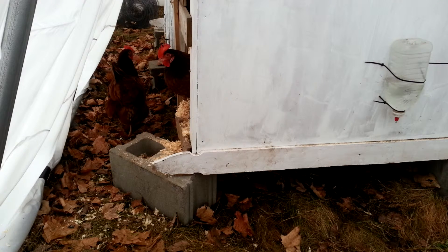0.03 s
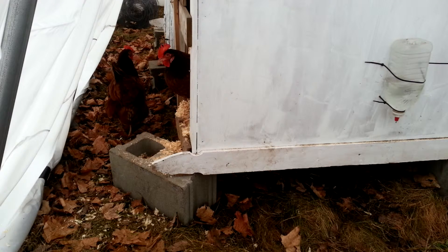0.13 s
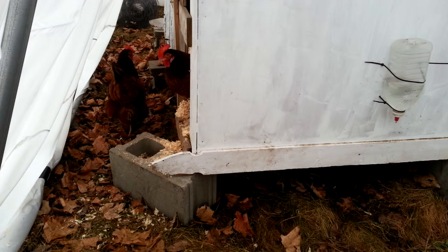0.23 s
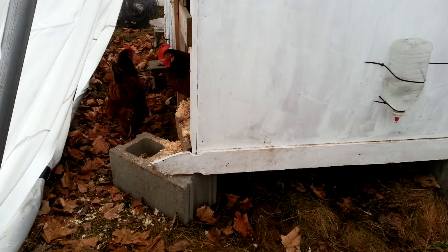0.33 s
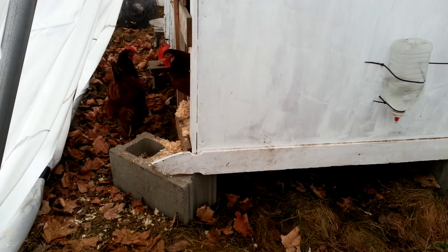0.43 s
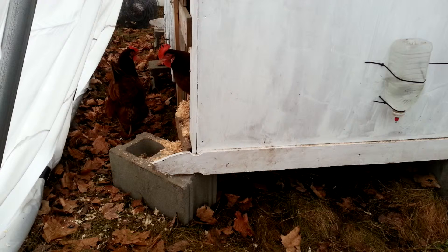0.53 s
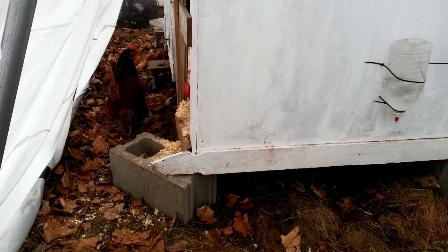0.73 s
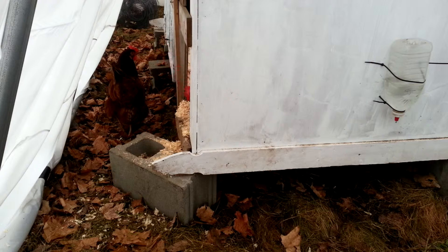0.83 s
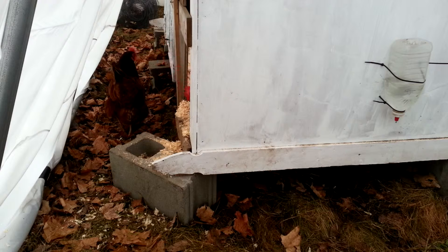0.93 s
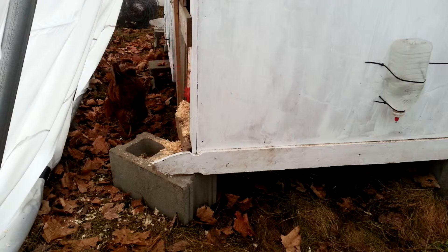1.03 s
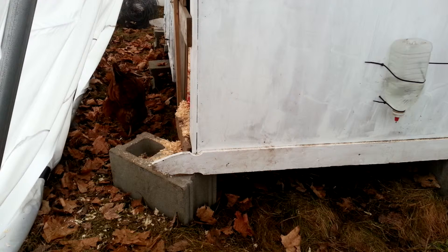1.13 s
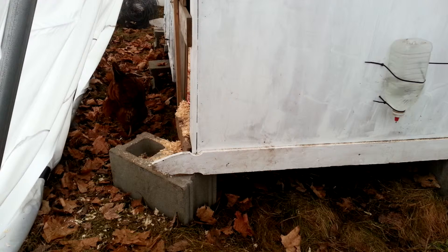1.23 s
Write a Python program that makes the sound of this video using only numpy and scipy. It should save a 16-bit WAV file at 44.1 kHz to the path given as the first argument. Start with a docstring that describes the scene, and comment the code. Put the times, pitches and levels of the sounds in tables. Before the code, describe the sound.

A chicken scratches in dry leaves with quick, crackling strokes in a quiet yard.

```python
"""A quiet yard, one microphone a few metres from a hen raking dry leaves behind a wooden coop.
Distant rumble, a faint hum and a far insect are there throughout. Her first strokes crush leaves into
crackle, scrape the litter and thud on the soil; the gap beside the coop adds a short ring. Midway
through the raking, twigs and a stalk snap and the claws strike. The leaves settle, two last strokes
follow, and a low drone swells briefly in the background."""
import sys
import numpy as np
from scipy import signal
from scipy.fft import rfft, irfft
from scipy.io import wavfile
from scipy.ndimage import uniform_filter1d

SR = 44100
rng = np.random.default_rng(int(sys.argv[2]) if len(sys.argv) > 2 else 0)


def int16_out(signal):
    """Quantize to a 16-bit WAV file."""
    q = np.round(np.clip(np.atleast_2d(signal).T, -1, 1) * 32767)
    wavfile.write(sys.argv[1], SR, q.astype(np.int16))


N = 57330


def amp(db):
    return 10 ** (np.asarray(db) / 20)


def unit_rms(x):
    return x / np.sqrt(np.mean(x ** 2))


def colour(x, spectrum, shift=1):
    """Filter a sound by a spectrum moved in pitch by a ratio; the filter is causal, with unit energy."""
    hz, db = np.array(spectrum, float).T
    bins_hz = np.maximum(np.fft.rfftfreq(8192, 1 / SR), 1)
    gain = amp(np.interp(np.log(bins_hz), np.log(hz * shift), db))
    cepstrum = irfft(np.log(gain))
    half = len(cepstrum) // 2
    cepstrum[1:half] *= 2  # fold to minimum phase
    cepstrum[half + 1:] = 0
    impulse = irfft(np.exp(rfft(cepstrum)))[:half]
    return signal.fftconvolve(x, impulse / np.sqrt(np.sum(impulse ** 2)))[:N]


def fall(age, t60):
    """Exponential decay that starts at age zero."""
    return np.exp(-np.log(1000) * np.maximum(age, 0) / t60)


# Spectrum of the open air in the yard: frequency_hz, level_db
YARD_SPECTRUM = [(20, -16), (50, 1), (90, -1.5), (160, -6), (225, -1), (290, -10.5), (400, -12),
                 (540, -14.5), (700, -11), (930, -15), (1250, -21.5), (1650, -22.5), (2500, -29),
                 (3300, -33), (4700, -32.5), (6300, -28), (7800, -33.5), (11000, -33), (15500, -38)]
# Steady hum in the background: pitch_hz, level_db
HUM_TONES = [(97, -87.5), (237, -81.5)]


def yard(t, level_db=-69.5, wander_db=1.5):
    """Distant rumble that wanders a little, with a faint hum."""
    wander = unit_rms(uniform_filter1d(uniform_filter1d(rng.standard_normal(N), 4000), 4000))
    air = amp(level_db + wander_db * wander) * colour(rng.standard_normal(N), YARD_SPECTRUM)
    hum = sum(amp(db) * np.sqrt(2) * np.sin(2 * np.pi * (hz * t + rng.random())) for hz, db in HUM_TONES)
    return air + hum


def insect(t, pitch_hz=8660, jitter_hz=8.7, level_db=-89, mean_period_s=.072, pause_s=.014):
    """Far from the microphone, an insect gives thin trills of uneven length with short pauses."""
    ends = np.cumsum(mean_period_s * (.5 + rng.random(32)))
    pauses = np.exp(-(2 * (t[:, None] - ends) / pause_s) ** 4).max(axis=1)
    hz = pitch_hz + jitter_hz * unit_rms(uniform_filter1d(rng.standard_normal(N), size=300))
    return amp(level_db) * np.sqrt(2) * (1 - pauses) * np.sin(2 * np.pi * np.cumsum(hz) / SR)


def foot_pressure(age, rise, hold, t60, curve=1.234):
    """A push rises and holds; with a curve above 1 it dies ever faster as the foot lifts."""
    late = np.maximum(age - rise - hold, 0) / t60
    return np.clip(age / rise, 0, 1) * np.exp(-np.log(1000) * late ** curve)


def fractures(rate_per_s=6000, spread_db=3.0):
    """Tiny random breaks in dry leaves, many weak and a few strong; rms 1."""
    size = amp(spread_db * np.minimum(rng.exponential(size=N), 5))
    breaks = rng.random(N) < rate_per_s / SR
    return unit_rms(breaks * size * rng.choice([-1, 1], N))


REFERENCE_HZ = 6200  # the pitch at which the leaf and crack spectra are unshifted
# Spectra of crushed leaves, scraped litter and struck soil: frequency_hz, level_db
LEAF_SPECTRUM = [(1000, -31), (2500, -15.5), (4000, -7), (5300, -2.5), (6500, 0), (7500, -5.5),
                 (9300, -14.5), (12000, -22), (16000, -26.5)]
SCRAPE_SPECTRUM = [(80, -20), (250, 1.5), (450, -1.5), (950, -1.5), (1150, -3), (1600, -3), (2200, -4),
                   (2600, -0.5), (4000, -5), (7000, -3), (14000, -31)]
THUD_SPECTRUM = [(25, -23), (48, -5), (90, 1), (125, 0), (180, -13.5), (400, -9), (1500, -60)]
# Strokes of a foot behind the coop:
# start_s, rise_s, hold_s, t60_s, crackle_db, scrape_db, thud_db, leaf_pitch_hz, hollow_pitch_hz
FOOT_STROKES = [(0.141, 0.0095, 0.0031, .11, -51.5, -67.5, -71, 6380, 2900),
                (0.151, 0.019, 0.0065, 0.08, -58, -56.5, -65, 5900, 620),
                (0.227, 0.0082, 0.013, 0.082, -44, -49, -58.5, 5520, 1800),
                (0.241, 0.02, .013, .10, -42, -45.5, -55.5, 6300, 900),
                (0.403, 0.023, 0.028, 0.11, -47.5, -53, -55, 5640, 1250),
                (0.463, 0.02, 0.023, 0.15, -38, -49, -60.5, 6230, 3200),
                (0.696, 0.029, .012, 0.11, -45, -47.5, -54, 6830, 1400),
                (0.717, 0.031, 0.019, 0.11, -39, -49, -55.5, 6600, 430)]


def strokes(t, hollow_q=3.4, hollow_db=-1, thud_lag_s=.001, thud_t60_s=.22):
    """Leaves crackle, litter scrapes and the soil thuds as a foot drags back, each time in a new spot."""
    leaves, soil = np.zeros(N), np.zeros(N)
    for start, rise, hold, t60, crackle_db, scrape_db, thud_db, leaf_hz, hollow_hz in FOOT_STROKES:
        push = foot_pressure(t - start, rise, hold, t60)
        crackle = amp(crackle_db) * colour(push * fractures(), LEAF_SPECTRUM, leaf_hz / REFERENCE_HZ)
        scrape = amp(scrape_db) * colour(push * fractures(), SCRAPE_SPECTRUM)
        # the hollow in the litter under the foot resonates
        hollow = amp(hollow_db) * signal.lfilter(*signal.iirpeak(hollow_hz, hollow_q, fs=SR), scrape)
        leaves += reflections(crackle + scrape + hollow, t)
        weight = foot_pressure(t - start - thud_lag_s, rise, hold, thud_t60_s)
        soil += amp(thud_db) * colour(weight * rng.standard_normal(N), THUD_SPECTRUM)
    return leaves, soil


def reflections(direct, t, t60_s=.084, relative_db=-2.5):
    """The coop wall and a tarpaulin close by smear each fracture on its way to the microphone."""
    tail = rng.standard_normal(N) * fall(t, t60_s)
    reflected = signal.fftconvolve(direct, tail / np.sqrt(np.sum(tail ** 2)))[:N]
    return (direct + amp(relative_db) * reflected) / np.hypot(1, amp(relative_db))


# Resonances of the gap beside the coop: pitch_hz, gain_db
GAP_RESONANCES = [(633, -6), (2530, -1), (2750, -13), (3140, -3), (3272, -3), (5408, -8)]


def gap_ring(x, t, t60_s=.13):
    """The gap beside the coop rings in narrow resonances that every stroke excites."""
    decay = 2 * np.log(1000) / (t60_s * SR) * fall(t, t60_s)  # scaled for unit gain at resonance
    ring = decay * sum(amp(db) * np.cos(2 * np.pi * hz * t) for hz, db in GAP_RESONANCES)
    return signal.fftconvolve(x, ring)[:N]


# Spectra of a snap's low knock, middle clack and high crack: frequency_hz, level_db
KNOCK_SPECTRUM = [(40, -20.5), (120, -10), (300, -7.5), (480, -7.5), (640, 1), (900, -6), (1250, -3.5),
                  (1700, -12), (5000, -39.5)]
CLACK_SPECTRUM = [(500, -28.5), (1200, -11), (1500, -4), (1900, 0), (2200, -6), (2600, -0.5), (3200, -5),
                  (4200, -8), (7000, -28), (14000, -45)]
CRACK_SPECTRUM = [(2500, -21.5), (4000, -12.5), (5000, -0.5), (6100, -1.5), (7800, -6.5), (9300, -16),
                  (12000, -25), (16000, -35)]
# Twigs and claws behind the coop:
# start_s, knock_db, clack_db, crack_db, crack_pitch_hz, tick_over_ring_db, ring_t60_s
TWIG_AND_CLAW_SNAPS = [(0.3774, -63.5, -55, -45, 6800, 0, 0.13), (0.3828, -66, -75, -41, 6400, 2, 0.11),
                       (.4120, -41.5, -44.5, -38.5, 4960, 15.5, .12),
                       (0.468, -42.5, -37.5, -40, 5800, 14.5, 0.1), (0.4733, -51, -35, -51, 5570, 3, 0.1)]


def snaps(t):
    """A twig cracks or a claw strikes: a sharp tick, then a dense, short ring, in three registers."""
    out = np.zeros(N)
    for start, knock_db, clack_db, crack_db, crack_hz, tick_db, t60 in TWIG_AND_CLAW_SNAPS:
        ring = (t > start) * fall(t - start, t60)
        tick = amp(tick_db) * signal.unit_impulse(N, int(start * SR))
        for db, spectrum, shift in [(knock_db, KNOCK_SPECTRUM, 1),
                                    (clack_db, CLACK_SPECTRUM, 1),
                                    (crack_db, CRACK_SPECTRUM, crack_hz / REFERENCE_HZ)]:
            out += amp(db) * colour(tick + ring * rng.choice([-1, 1], N), spectrum, shift)
    return out


def stalk(t, start_s=.3825, pitch_hz=6200, level_db=-25.5, rise_s=.00027):
    """One dry stalk breaks with a bright click of a few cycles."""
    age = np.maximum(t - start_s, 0)
    envelope = age / rise_s * np.exp(1 - age / rise_s)
    return amp(level_db) * envelope * np.sin(2 * np.pi * pitch_hz * age)


def settling(t, start_s=.625, end_s=.70, level_db=-77):
    """The leaves settle with a faint crackle between two strokes."""
    return amp(level_db) * colour(fractures() * (t > start_s) * (t < end_s), LEAF_SPECTRUM)


def drone(t, peak_s=.839, half_width_s=.07, pitch_hz=212, q=9, level_db=-64.5):
    """A narrow low drone rises out of the background and sinks again."""
    band = signal.lfilter(*signal.iirpeak(pitch_hz, q, fs=SR), rng.standard_normal(N))
    swell = np.exp(-((t - peak_s) / half_width_s) ** 2)
    return amp(level_db) * unit_rms(band) * swell


def scene():
    """The hen and the yard around her, in mono at the microphone."""
    t = np.arange(N) / SR
    leaves, soil = strokes(t)
    hen = leaves + settling(t) + snaps(t) + stalk(t)
    return (hen + gap_ring(hen, t) + soil + yard(t) + drone(t) + insect(t))[None]


def record(dry, cutoff_hz=15900):
    """The recorder cuts the top treble steeply."""
    return signal.sosfilt(signal.ellip(10, .2, 70, cutoff_hz, fs=SR, output="sos"), dry)


dry = scene()
out = record(dry)
int16_out(out)
```